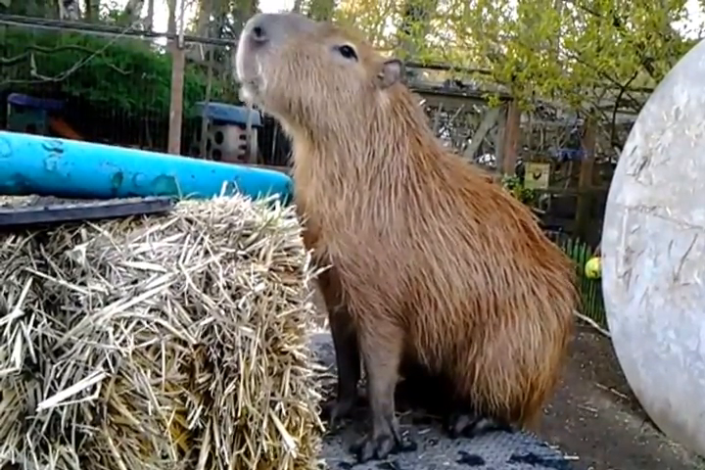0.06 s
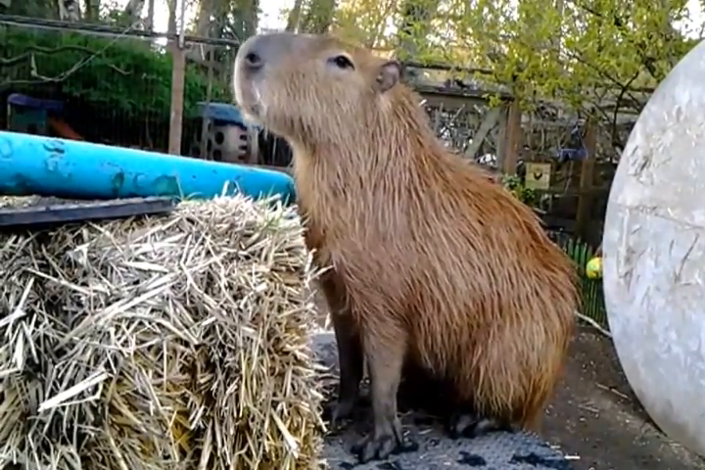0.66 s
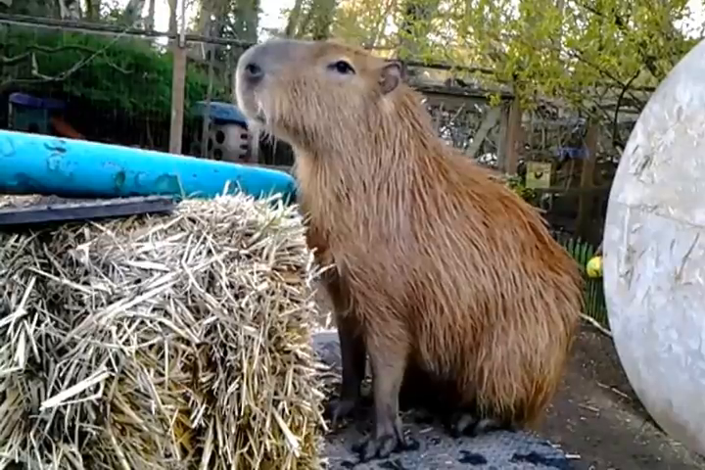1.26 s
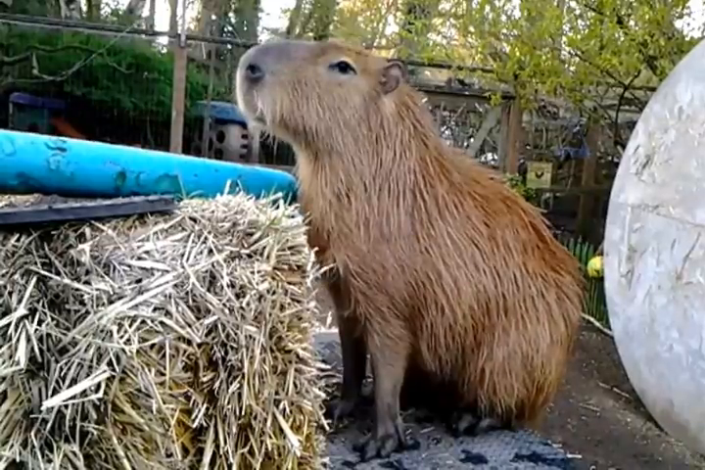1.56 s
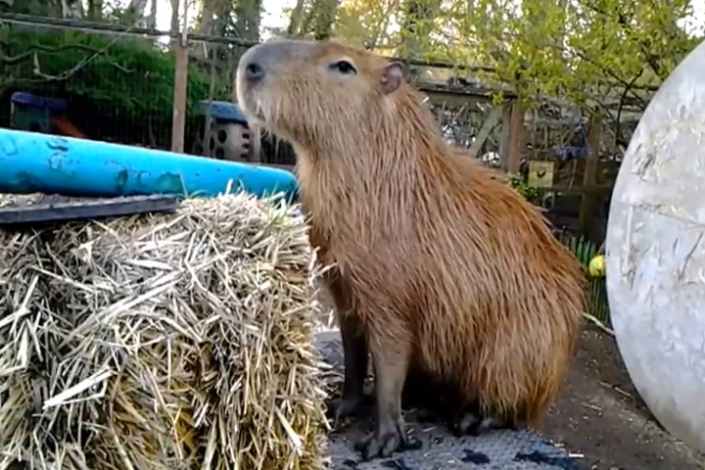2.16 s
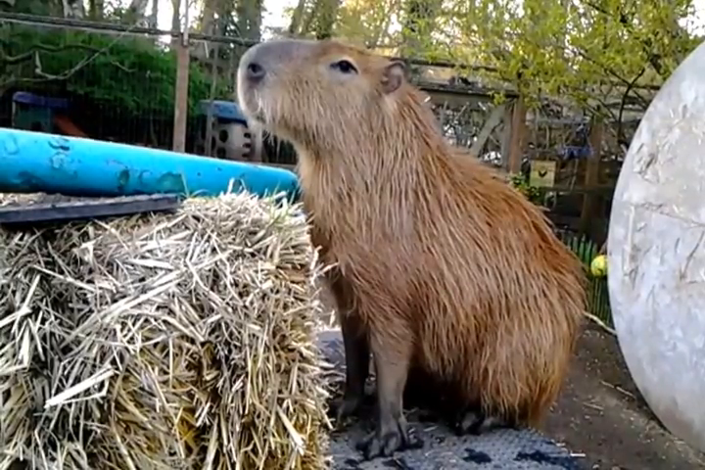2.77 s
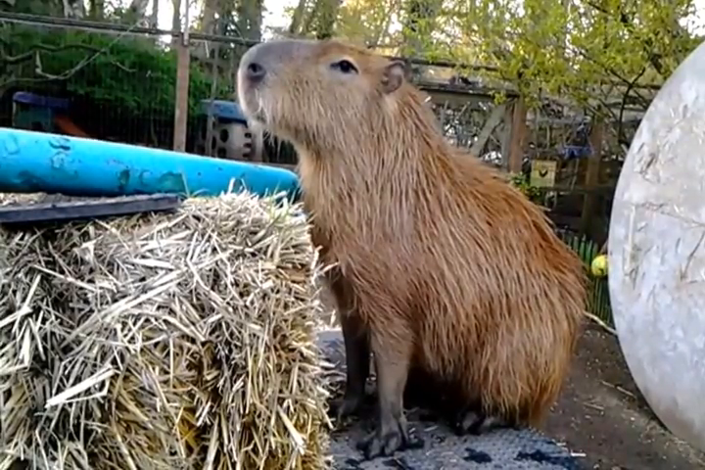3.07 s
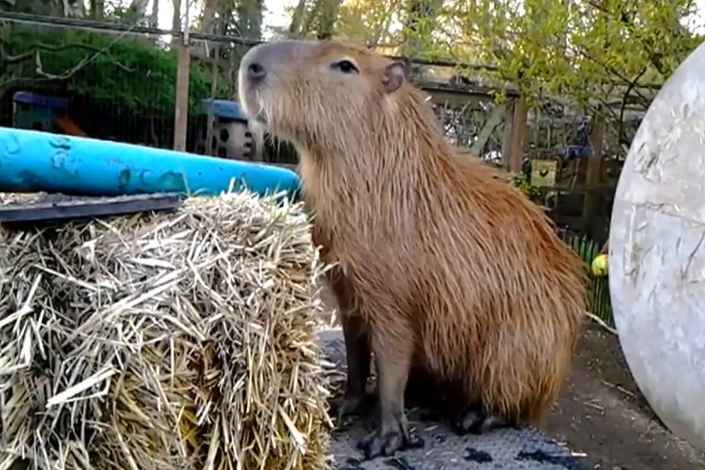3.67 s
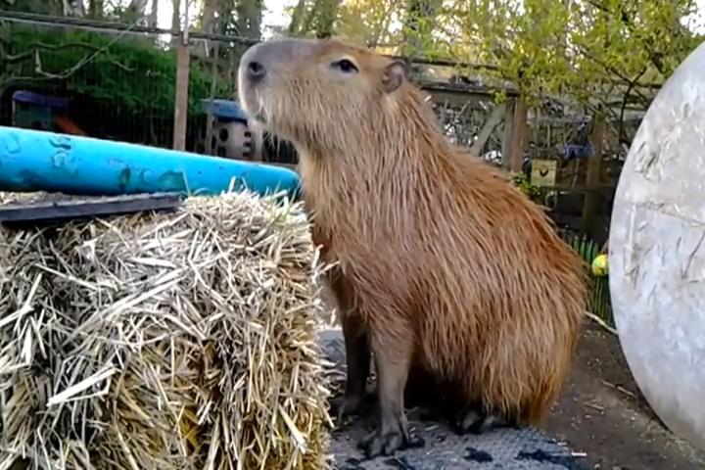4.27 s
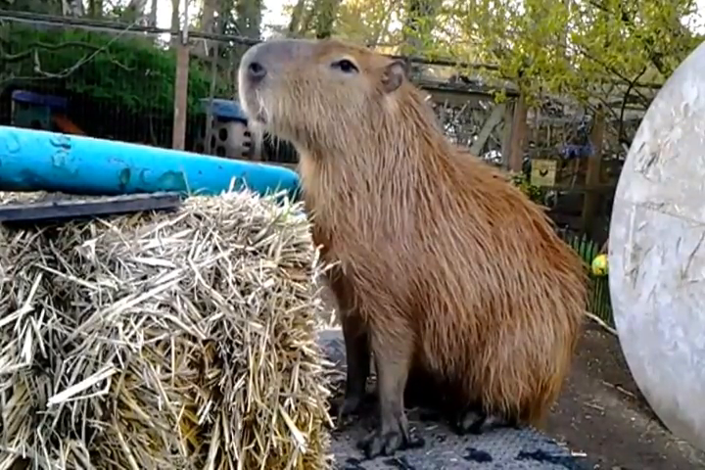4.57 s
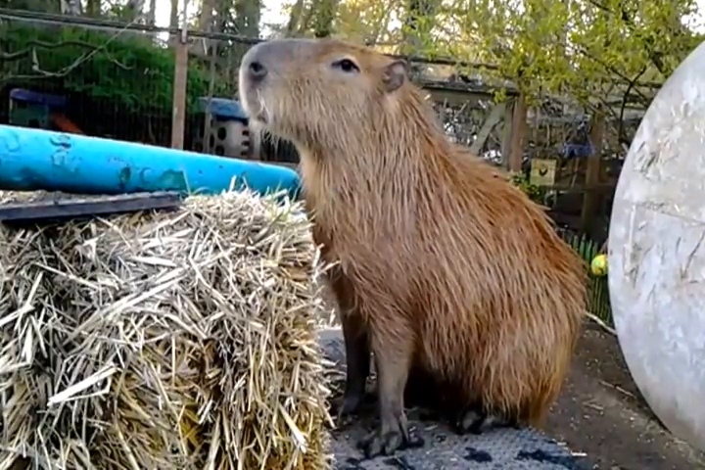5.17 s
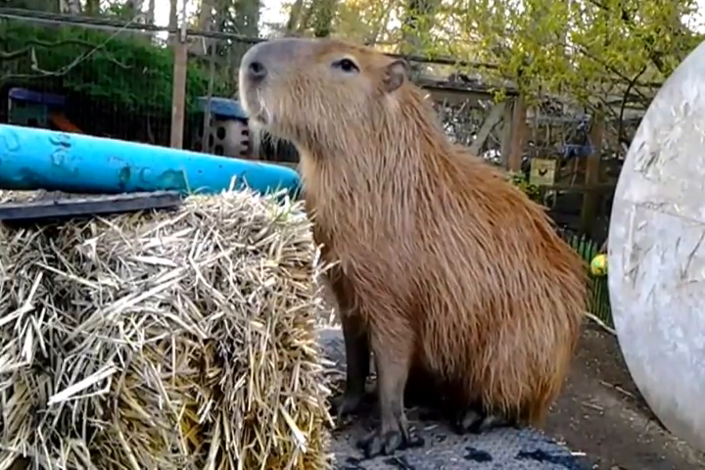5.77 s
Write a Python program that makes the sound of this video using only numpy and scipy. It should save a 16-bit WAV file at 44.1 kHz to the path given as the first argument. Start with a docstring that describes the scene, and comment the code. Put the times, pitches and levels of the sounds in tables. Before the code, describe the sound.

A capybara gives two short, hoarse, whistling barks outdoors, sniffing after each, with faint birds and distant traffic behind.

```python
"""A capybara barks twice in an outdoor pen: each bark is a hoarse blast of air with a whistle arching
through it. After each one the animal draws air back in through its nose. Fence and trees return a
short tail. Small birds chirp and sing over a soft wash of far traffic and leaves, with faint
swells of hiss and a distant drone."""
import sys
import numpy as np
from scipy import signal
from scipy.fft import rfft, irfft
from scipy.io import wavfile

SR = 44100
rng = np.random.default_rng(int(sys.argv[2]) if len(sys.argv) > 2 else 0)


def wav_record(signal):
    """Record a signal, one row per channel, as 16-bit PCM in the file named by sys.argv[1]."""
    frames = np.transpose(np.atleast_2d(signal))
    bounded = np.clip(frames, -1, 1)
    # unit amplitude maps onto the largest positive 16-bit level
    quanta = np.round(bounded * 32767).astype(np.int16)
    wavfile.write(sys.argv[1], SR, quanta)


N = 265482
TIME = np.arange(N) / SR


def gain_of(db):
    """Decibels to gain."""
    return 10 ** (np.asarray(db) / 20)


def unit_rms(x):
    """Scales to rms 1."""
    return x / np.sqrt(np.mean(x ** 2) + 1e-20)


def lookup(points, hz):
    """Interpolates a table on a log-frequency axis."""
    f, value = np.transpose(points)
    return np.interp(np.log(hz + 1), np.log(f + 1), value)


def add(mix, start_s, sound):
    """Mixes a sound in at start_s."""
    part = mix[round(start_s * SR):][:len(sound)]
    part += sound[:len(part)]


def phase_of(hz):
    """Running phase in radians."""
    return 2 * np.pi * np.cumsum(hz) / SR


def envelope(t, attack_s, hold_until_s, fall_db_per_s):
    """Linear rise, hold, steady fall in dB."""
    return np.clip(t / attack_s, 0, 1) * gain_of(-fall_db_per_s * np.maximum(t - hold_until_s, 0))


def noise(shape, size):
    """Noise of rms 1 with amplitude spectrum shape(Hz)."""
    hz = np.fft.rfftfreq(N, 1 / SR)
    return unit_rms(irfft(rfft(rng.standard_normal(N)) * shape(hz), N)[:size])


def drift(hz, size):
    """Random movement up to about hz."""
    return noise(lambda f: 1 / (1 + (f / hz) ** 4), size)


def peak(hz, centre_hz, width_hz):
    """Resonance curve of height 1."""
    return 1 / (1 + ((hz - centre_hz) / (width_hz / 2)) ** 2)


def resonance(hz, width_hz, size):
    """Turbulent air ringing in a steady or moving resonance."""
    carrier = np.exp(1j * phase_of(hz * np.ones(size)))
    air = rng.standard_normal((2, SR))
    ring = np.fft.ifft((air[0] + 1j * air[1]) * peak(np.fft.fftfreq(SR, 1 / SR), 0, width_hz))
    return unit_rms((np.resize(ring, size) * carrier).real)


def ragged(hz, width_hz, size, flutter_db=3.0):
    """A tone with jitter in pitch and level."""
    phase = phase_of(hz + width_hz / 2 * drift(86, size))
    return unit_rms(np.sin(phase) * gain_of(flutter_db * drift(60, size)))


def burst(source, start_s, length_s, hz, width_hz, db, taper):
    """One tapered stretch of a source, placed in the scene."""
    size = round(length_s * SR)
    out = np.zeros(N)
    add(out, start_s, gain_of(db) * source(hz, width_hz, size) * signal.windows.tukey(size, taper))
    return out


def swell(start_s, length_s, hz, width_hz, db, fall_db_per_s, attack_s=0.12):
    """A noise band that rises and ebbs."""
    band = burst(resonance, start_s, length_s, hz, width_hz, db, taper=0.1)
    return band * envelope(TIME - start_s, attack_s, attack_s, fall_db_per_s)


# Outdoor wash spectrum. Each row: frequency in Hz, relative density in dB.
WASH_SPECTRUM = [(15, -62), (25, -39.5), (74, -29), (109, -28), (294, -10), (356, -10.5), (410, -7),
                 (707, -3), (963, 0.5), (1280, -1.5), (1410, -3), (1660, -2.5), (2310, -9.5), (5180, -10),
                 (7220, -20.5), (9390, -26.5), (15900, -120)]


def outdoor_wash(level_db=-58.5, wander_db=0.9, ebb_db_per_s=0.23, rumble_db=-96):
    """Far traffic and leaves, slowly ebbing, over a faint rumble."""
    db = level_db + ebb_db_per_s * (TIME.mean() - TIME) + wander_db * drift(6.2, N)
    wash = gain_of(db) * noise(lambda f: gain_of(lookup(WASH_SPECTRUM, f)), N)
    rumble = gain_of(rumble_db) * noise(lambda f: peak(f, centre_hz=105, width_hz=44), N)
    return wash + rumble


# Decay of the pen. Each row: frequency in Hz, T60 in seconds.
PEN_DECAY = [(300, 1), (1100, 0.58), (2500, 0.68), (5000, 0.49), (8000, 0.074)]


def pen_tail(x, delay_s=0.018, taps_per_s=2000):
    """Scatter from fence and trees: sparse taps, each band dying at its own rate."""
    taps = rng.standard_normal(SR) * (rng.random(SR) < taps_per_s / SR)
    hz, t, spectrum = signal.stft(taps, SR, nperseg=256)
    decay = gain_of(-60 * t / lookup(PEN_DECAY, hz)[:, None])
    response = signal.istft(spectrum * decay, SR, nperseg=256)[1]
    out = np.zeros(N)
    add(out, delay_s, signal.fftconvolve(x, response / np.linalg.norm(response))[:N])
    return out


# Puffs of hiss. Each row: start in seconds, length in seconds, level in dB.
HISS_PUFFS = [(0.883, 0.18, -58), (5.512, 0.18, -62), (5.908, 0.12, -65)]
# Bands of a puff. Each row: centre in Hz, width in Hz, level offset in dB.
HISS_BANDS = [(2300, 790, -1), (5500, 1200, -2)]


def hiss_puffs():
    """Soft, short puffs of two-band noise."""
    return sum(burst(resonance, start_s, length_s, hz, width_hz, db + band_db, taper=0.31)
               for start_s, length_s, db in HISS_PUFFS for hz, width_hz, band_db in HISS_BANDS)


def drone():
    """A distant low tone that comes and goes."""
    return burst(ragged, start_s=0.9, length_s=1.78, hz=80, width_hz=12, db=-88, taper=0.15)


# Base spectrum of a bark's air. Each row: frequency in Hz, relative density in dB.
RUSH_SPECTRUM = [(850, -28), (1450, 2.5), (1530, -3), (1820, -4), (2060, 0.5), (2350, -4), (2690, -4.5),
                 (2840, -5), (3000, -6), (3710, -9), (4990, -6), (5710, -12), (7220, -39.5), (9390, -81.5),
                 (15900, -120)]
# Throat and muzzle resonances. Each row: centre in Hz, width in Hz, weight in dB.
TRACT_RIDGES = [(1643, 41, -10), (1820, 44, -19), (2396, 75, 0), (2495, 35, -9), (2820, 64, -13),
                (3126, 9.3, -1), (4270, 43, -8.5), (4390, 10, -8), (4920, 280, -15.5), (5760, 88, -22.5)]


def rush_colour(hz, ridge_db=9, low_cut_hz=1150):
    """Spectrum of the rushing air: broad, ridged by resonances, weak in the bass."""
    ridges = sum(gain_of(db / 2) * peak(hz, centre, width) for centre, width, db in TRACT_RIDGES)
    return gain_of(lookup(RUSH_SPECTRUM, hz) + ridge_db * ridges) / (1 + (low_cut_hz / (hz + 1)) ** 12)


def air_rush(t, hoarse_hz, brighten_s=0.17, hollow_db=-9, hoarse_db=-13.5, rasp_db=1.65):
    """Brightening air with a hollow band and a hoarse tone, chopped unevenly by flapping tissue."""
    size = len(t)
    air = noise(rush_colour, size)
    treble = signal.sosfiltfilt(signal.butter(2, 3400, "high", fs=SR, output="sos"), air)
    tilt_db = np.interp(t, [0, brighten_s], [-7.5, 10])
    air = unit_rms(treble * gain_of(tilt_db / 2) + (air - treble) * gain_of(-tilt_db / 2))
    air += gain_of(hollow_db) * resonance(hz=1200, width_hz=210, size=size)
    air += gain_of(hoarse_db) * ragged(hoarse_hz, width_hz=55, size=size)
    return air * unit_rms(gain_of(rasp_db * drift(170, size)))


def whistle(blow, hz, waver=0.0027, flutter_db=2.0, throb_depth=0.51, throb_hz=40, octave_db=-27):
    """Locks in when blown hard, wavers when weak, throbs as the pressure falls."""
    size = len(blow)
    db = 20 * np.log10(blow + 1e-4)
    loose = np.clip((db.max() - db) / 12, 0.2, 1)
    phase = phase_of(hz * (1 + waver * (1 + 3 * loose) * drift(90, size)))
    tone = np.sqrt(2) * (np.sin(phase) + gain_of(octave_db) * np.sin(2 * phase))
    fallen = np.clip((np.maximum.accumulate(db) - db) / 4, 0, 1)
    throb_phase = phase_of(throb_hz * (1 + 0.18 * drift(19, size)))
    throb = 1 + throb_depth * fallen * np.sin(throb_phase)
    return gain_of(db + flutter_db * loose * drift(60, size)) * throb * tone


# Opening tones of a bark. Each row: pitch in Hz, width in Hz, level offset in dB.
THROAT_CLUSTER = [(775, 31, -14.5), (1297, 65, -7.5), (1376, 36, 1), (1830, 34, -3), (2346, 47, -15)]


def throat_tones(start_s, cluster_db, grunt_hz, grunt_db, groan_db):
    """A grunt and ragged tones as the throat opens, a groan as it closes."""
    cluster = sum(burst(ragged, start_s + 0.015, 0.105, hz, width_hz, cluster_db + db, taper=0.7)
                  for hz, width_hz, db in THROAT_CLUSTER)
    grunt = burst(ragged, start_s, length_s=0.11, hz=grunt_hz, width_hz=22, db=grunt_db, taper=0.31)
    groan = burst(ragged, start_s + 0.13, length_s=0.19, hz=757, width_hz=14, db=groan_db, taper=0.78)
    return cluster + grunt + groan


# Capybara barks. Each row: start in seconds, air attack in seconds, air level in dB, whistle delay and
# attack in seconds, whistle level in dB, whistle top in Hz, lower tone attack in seconds, lower tone
# level in dB, cluster level in dB, grunt pitch in Hz, grunt and groan levels in dB. Levels are relative.
CAPYBARA_BARKS = [(0.983, 0.038, -26, 0.06, 0.05, -16, 1189, 0.0094, -31.5, -29, 449, -50, -41.5),
                  (3.648, 0.098, -27.5, 0.0093, 0.093, -14.5, 1181, 0.076, -34, -40, 712, -51, -51.5)]


def bark(start_s, air_attack_s, air_db, whistle_delay_s, whistle_attack_s, whistle_db, top_hz,
         lower_attack_s, lower_db, *throat, length_s=0.31, widest_at_s=0.0998, narrowing_s=0.085):
    """Returns air and tones of one blast; whistle and lower tone sag where the throat is narrow."""
    t = np.arange(0, length_s, 1 / SR)
    narrow = 1 - np.exp(-((t - widest_at_s) / narrowing_s) ** 2)
    arch = 1 - 0.055 * narrow
    pressure = envelope(t, air_attack_s, hold_until_s=0.12, fall_db_per_s=89)
    pressure *= np.minimum(t / air_attack_s, 1) ** 0.51
    rush = gain_of(air_db - 2) * pressure * air_rush(t, hoarse_hz=2400 * arch)
    blow = envelope(t - whistle_delay_s, whistle_attack_s, 0.14 - whistle_delay_s, fall_db_per_s=192.5)
    tone = gain_of(whistle_db - 1.36) * whistle(blow, top_hz * arch)
    lower = ragged(hz=1006.5 * (1 - 0.13 * narrow), width_hz=50, size=len(t))
    lower *= envelope(t, lower_attack_s, hold_until_s=0.2, fall_db_per_s=170)
    lower *= gain_of(lower_db - 4 * blow)  # yields to the whistle
    fade = signal.windows.tukey(len(t), 0.03)
    air, tones = np.zeros(N), throat_tones(start_s, *throat)
    add(air, start_s, fade * rush)
    add(tones, start_s, fade * (tone + lower))
    return np.array([air, tones])


def echoed(x, echoes):
    """Direct sound plus single reflections."""
    out = x.copy()
    for delay_s, db in echoes:
        add(out, delay_s, gain_of(db) * x)
    return out


# Reflections off ground, bale and fence. Each row: delay in seconds, level in dB.
NEAR_ECHOES = [(0.0031, -16), (0.0074, -9.5), (0.0128, -13), (0.023, -6.5), (0.035, -11)]
# Slaps from the far sides of the pen. Each row: delay in seconds, level in dB.
FAR_SLAPS = [(0.062, -18.5), (0.105, -18)]


def barks_in_pen(rows, air_wet_db=-13, tone_wet_db=-15, low_cut_hz=330):
    """Barks with the pen's reflections and tail, bass removed."""
    air, tones = sum(bark(*row) for row in rows)
    early = echoed(echoed(air, NEAR_ECHOES) + tones, FAR_SLAPS)
    late = pen_tail(gain_of(air_wet_db) * air + gain_of(tone_wet_db) * tones)
    return signal.sosfilt(signal.butter(4, low_cut_hz, "high", fs=SR, output="sos"), early + late)


def bird_note(length_s, glide_hz, db, waver=0.016, near_db=-50):
    """A thin glide through start, middle and end pitch; fainter notes are farther and more blurred."""
    progress = np.linspace(0, 1, round(length_s * SR))
    hz = np.polyval(np.polyfit([0, 0.5, 1], glide_hz, 2), progress)
    blur = np.clip((near_db - db) / 6, 0.3, 3)
    phase = phase_of(hz * (1 + waver * blur * drift(300, len(hz))))
    return gain_of(db) * np.sqrt(2) * np.sin(phase) * signal.windows.tukey(len(hz), 0.5)


# Chirps of the first bird. Each row: start in seconds, level in dB.
RISING_CHIRPS = [(1.444, -58.5), (1.63, -55.5), (1.751, -54), (1.962, -52), (2.145, -55)]


def chirping_bird():
    """One bird repeats a rising chirp."""
    out = np.zeros(N)
    for start_s, db in RISING_CHIRPS:
        add(out, start_s, bird_note(length_s=0.028, glide_hz=(4440, 4660, 5380), db=db))
    return out


# In-breaths. Each row: start in seconds, length in seconds, relative level in dB.
IN_BREATHS = [(1.623, 0.77, -48), (3.89, 0.55, -48)]
# Steady nose resonances. Each row: centre in Hz, width in Hz, relative level in dB.
NOSE_MODES = [(1912, 156, -0.5), (2217, 120, -1.5), (2555, 530, -1.5), (3130, 800, -7), (5500, 1040, -4.5)]


def sniff(start_s, length_s, db, attack_s=0.03, release_s=0.13, sink_s=0.36, sag_db=-4):
    """Air drawn through the nose; two resonances shift as the nostrils move."""
    t = np.arange(0, length_s, 1 / SR)
    size, progress = len(t), t / length_s
    flare = np.sin(np.pi * progress ** 0.67) ** 2  # opens early, closes slowly
    lower_hz = np.interp(t, [0, sink_s], [2210, 1994])
    upper_hz = 4465 - 660 * flare
    air = sum(gain_of(mode_db) * resonance(hz, width_hz, size) for hz, width_hz, mode_db in NOSE_MODES)
    air += gain_of(-15.5 + 15 * flare) * resonance(lower_hz, width_hz=90, size=size)
    air += gain_of(2.5) * resonance(upper_hz, width_hz=720, size=size)
    flow = np.minimum(t / attack_s, 1) * np.minimum((length_s - t) / release_s, 1)
    out = np.zeros(N)
    add(out, start_s, gain_of(db - 2 + sag_db * progress ** 2) * flow * unit_rms(air))
    return out


def midrange_hiss():
    """One long, soft swell of noise."""
    return swell(start_s=2.28, length_s=1.7, hz=1343, width_hz=820, db=-59, fall_db_per_s=9.5)


# Far bird calls. Each row: start in seconds, length in seconds, centre in Hz, width in Hz, level in dB.
FAR_BIRD_CALLS = [(2.34, 0.2, 5200, 800, -62), (2.72, 0.28, 2285, 110, -64),
                  (2.76, 0.091, 5900, 600, -66.5), (3.15, 0.08, 6080, 600, -68),
                  (3.29, 0.089, 3880, 594, -64), (3.37, 0.16, 2240, 203, -63)]


def far_birds():
    """Calls, then a fading twitter, blurred by distance into noise bands."""
    calls = sum(burst(resonance, *row, taper=0.5) for row in FAR_BIRD_CALLS)
    twitter = swell(start_s=5.0, length_s=1, hz=3010, width_hz=1100, db=-65, fall_db_per_s=17)
    return calls + twitter


# Syllables of the second bird. Each row: start in seconds, held note level in dB, slur level in dB.
SONG_SYLLABLES = [(4.842, -73, -64), (4.966, -59.5, -63), (5.087, -60, -62.5), (5.215, -61.5, -64.5),
                  (5.345, -63, -66), (5.491, -66, -62.5)]


def singing_bird(slur_delay_s=0.014):
    """A run of syllables, each a held note overlapped by a downward slur."""
    out = np.zeros(N)
    for start_s, held_db, slur_db in SONG_SYLLABLES:
        held = bird_note(length_s=0.045, glide_hz=(5320, 5280, 5150), db=held_db)
        slur = bird_note(length_s=0.05, glide_hz=(5100, 4480, 3440), db=slur_db)
        add(out, start_s, held)
        add(out, start_s + slur_delay_s, slur)
    return out


def scene(bird_wet_db=-6, airy_wet_db=-11, earlier_age_s=0.36, earlier_db=-3):
    """Capybara, birds and wash in mono; opens on the dying tail of an earlier bark."""
    mix = barks_in_pen(CAPYBARA_BARKS) + outdoor_wash() + drone()
    tail_from_s = CAPYBARA_BARKS[-1][0] + earlier_age_s
    earlier_tail = barks_in_pen(CAPYBARA_BARKS[-1:])[round(tail_from_s * SR):]
    add(mix, 0, gain_of(earlier_db) * earlier_tail)
    airy = sum(sniff(*row) for row in IN_BREATHS) + hiss_puffs() + midrange_hiss() + far_birds()
    birds = chirping_bird() + singing_bird()
    scatter = pen_tail(gain_of(airy_wet_db) * airy + gain_of(bird_wet_db) * birds)
    return (mix + airy + birds + scatter)[None]


def record(dry, low_cut_hz=45, edge_hz=7450, mirror_hz=16000, image_top_hz=9500, image_db=-19):
    """Bass cut, steep top edge, and a faint mirror image of the treble above that edge."""
    dry = signal.sosfilt(signal.butter(2, low_cut_hz, "high", fs=SR, output="sos"), dry)
    edge_filter = signal.firwin(255, edge_hz, window=("kaiser", 7), fs=SR)
    band = signal.oaconvolve(dry, edge_filter[None], "same")
    mirror = 2 * band * np.cos(2 * np.pi * mirror_hz * TIME)
    image_filter = signal.firwin(91, image_top_hz, window=("kaiser", 8), fs=SR)
    image = signal.oaconvolve(mirror, image_filter[None], "same")
    return band + gain_of(image_db) * image


dry = scene()
out = record(dry)
wav_record(out)
```